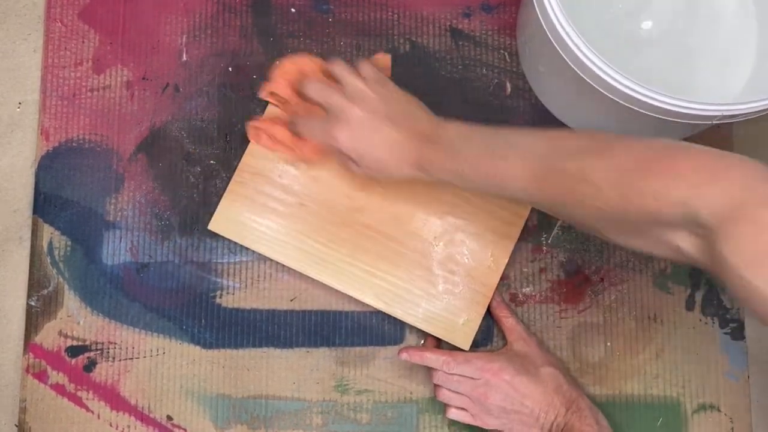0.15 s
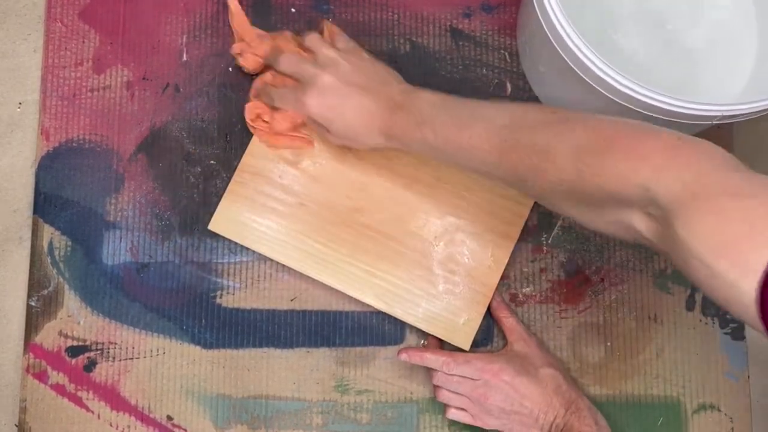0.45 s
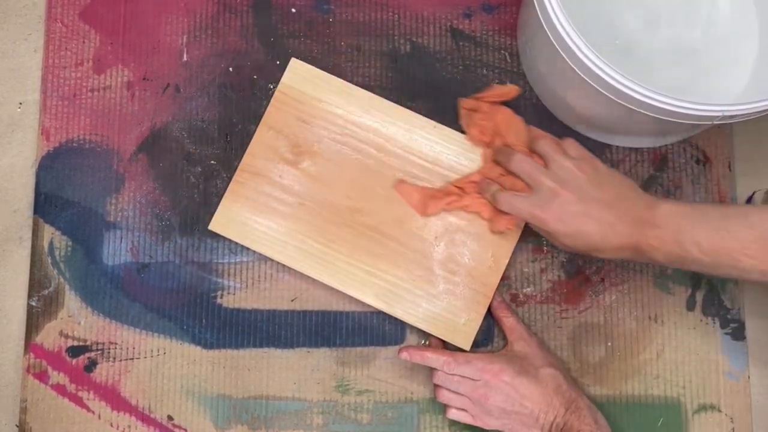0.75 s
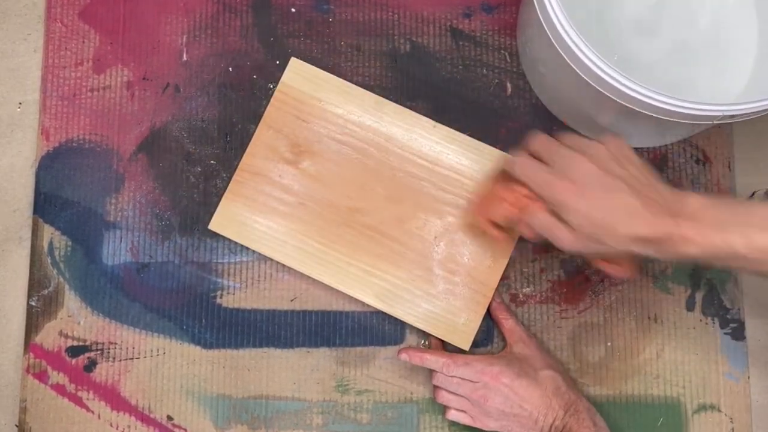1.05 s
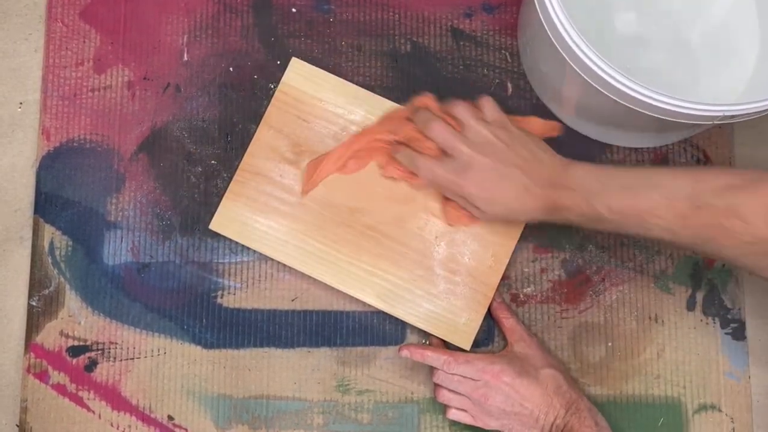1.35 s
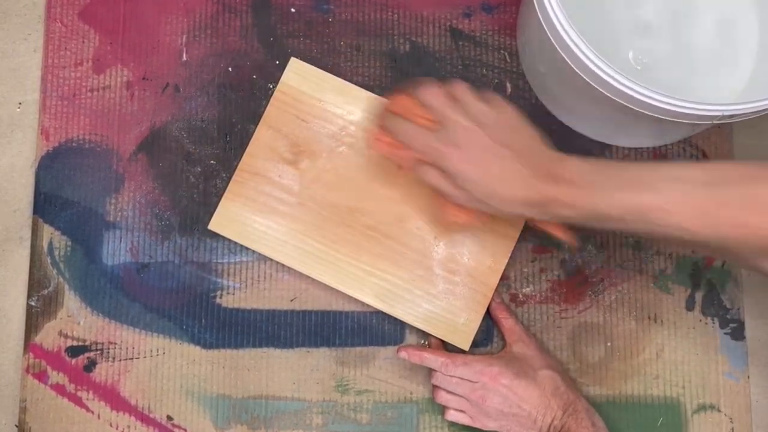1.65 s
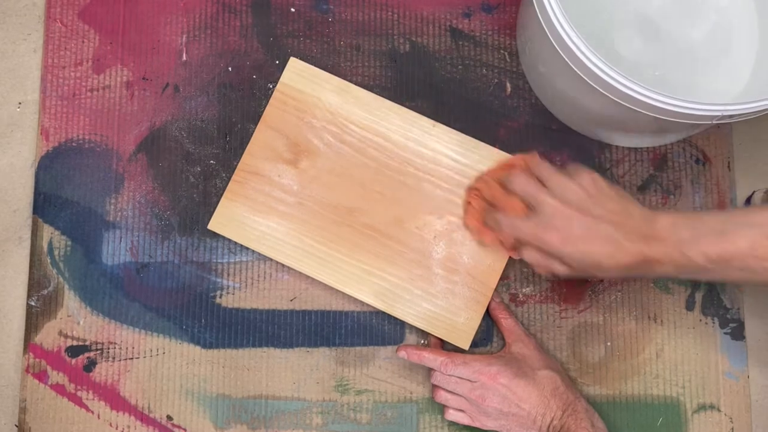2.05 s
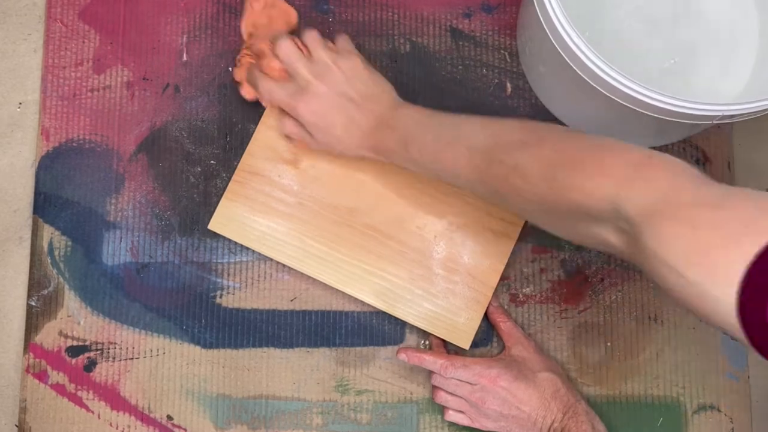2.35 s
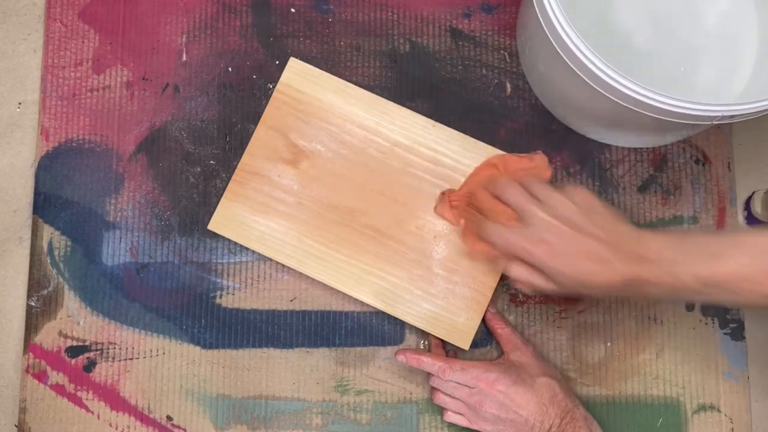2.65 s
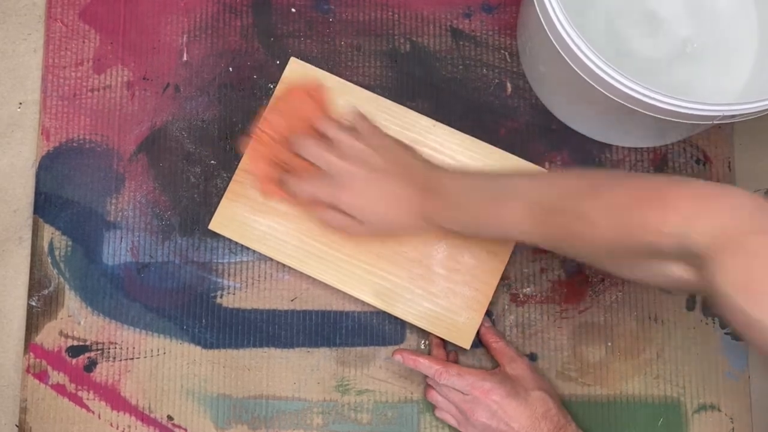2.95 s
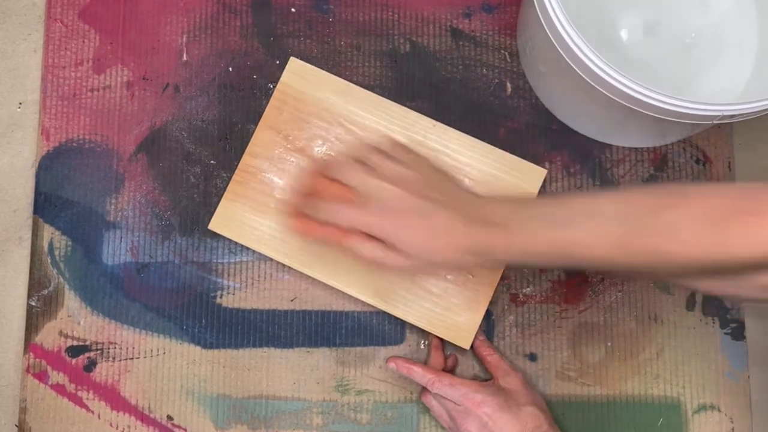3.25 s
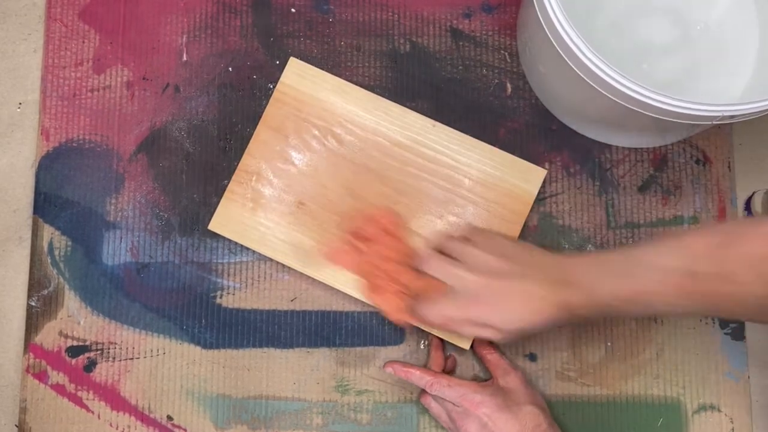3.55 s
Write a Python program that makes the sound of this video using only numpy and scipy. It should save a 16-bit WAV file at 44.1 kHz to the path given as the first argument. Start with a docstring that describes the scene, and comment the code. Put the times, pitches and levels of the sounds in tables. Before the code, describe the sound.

A damp cloth wiped back and forth over a wooden board in quick, scratchy strokes.

```python
"""Wiping a wooden board

At a workbench, close to a two-port microphone, a damp cloth is wiped to and fro over a small board.
Its fibres hiss with its speed, and it pats and ticks where it lands or catches an edge.
Each push of the hand makes the bench top boom at its low modes. Faint room noise lies behind."""
import sys
import numpy as np
from scipy import signal
from scipy.fft import rfft, irfft, next_fast_len
from scipy.io import wavfile
from scipy.ndimage import uniform_filter1d

SR = 44100
rng = np.random.default_rng(int(sys.argv[2]) if len(sys.argv) > 2 else 0)


def int16_out(signal):
    """Quantize to a 16-bit WAV file."""
    q = np.round(np.clip(np.atleast_2d(signal).T, -1, 1) * 32767)
    wavfile.write(sys.argv[1], SR, q.astype(np.int16))


N = 163170

# strokes of the sliding cloth: t/s, hiss level/dB, drag level/dB
STROKES = [(0.0, -57.5, -61.5), (0.07, -67, -61), (0.132, -48.5, -54.5), (0.28, -61, -70.5),
           (0.35, -57, -60.5), (0.399, -59.5, -51.5), (0.481, -48, -56), (0.64, -46, -66.5),
           (0.789, -53, -60), (0.85, -51, -56), (0.889, -42, -62), (0.98, -58, -69.5),
           (1.142, -64.5, -67.5), (1.182, -48.5, -49), (1.2, -57.5, -59.5), (1.23, -54.5, -47.5),
           (1.27, -60.5, -52), (1.34, -48.5, -58.5), (1.45, -48.5, -64), (1.56, -62.5, -67),
           (1.671, -64.5, -70), (1.702, -52.5, -51), (1.74, -60.5, -51), (1.87, -45.5, -53.5),
           (1.97, -48, -55), (2.031, -62.5, -63.5), (2.239, -64, -79.5), (2.272, -57.5, -48.5),
           (2.32, -56, -54), (2.41, -45.5, -65.5), (2.53, -47.5, -59.5), (2.62, -62.5, -71),
           (2.69, -54.5, -69), (2.758, -57.5, -67.5), (2.812, -52.5, -49.5), (2.85, -64.5, -59.5),
           (2.948, -43.5, -58), (3.06, -49.5, -62), (3.128, -61.5, -67.5), (3.23, -58.5, -67.5),
           (3.25, -57.5, -59), (3.291, -66.5, -59.5), (3.318, -40.5, -38), (3.358, -55, -47.5),
           (3.46, -43.5, -54), (3.55, -50, -63), (3.69, -67, -72.5)]
# spectra of the bright hiss and the duller drag: f/Hz, level/dB
HISS_SPECTRUM = [(300, -21.5), (1200, -6.5), (2200, -2), (3300, -1.5), (5000, -4.5), (6500, -3.5),
                 (8500, -5), (11000, 1), (12300, -5), (14000, -10)]
DRAG_SPECTRUM = [(150, 3.5), (300, -2), (600, -1), (1400, -4.5), (2500, -13.5), (6000, -30)]
GRAIN_DB, FLICKER_DB, FLICKER_HZ = 2, 1.3, 29.35
PATCH_DB, PATCH_HZ, PATCH_S = 2.5, 170, .03

# room noise: f/Hz, level/dB
ROOM_SPECTRUM = [(30, -23), (60, -26), (125, -14), (300, -16), (1000, -21), (3000, -26)]
ROOM_DB, ECHO_T60_S = -77, 0.053

# pats and catches of the cloth: t/s, knock peak/dB, f/Hz, crack level/dB
PATS = [(0.053, -42, 1210, -37), (0.095, -46, 890, -58), (0.389, -34.5, 1180, -36),
        (0.426, -34, 1600, -34.5), (1.014, -48, 2140, -44), (1.159, -44, 1260, -61), (1.17, -45, 1890, -32),
        (1.178, -52, 2900, -35), (1.183, -38.5, 1320, -22), (1.221, -34.5, 1200, -51),
        (1.475, -41, 1440, -49), (1.535, -47, 2240, -61), (1.7, -32, 1020, -27.5),
        (2.09, -49.5, 940, -41.5), (2.263, -40.5, 1230, -33.5), (2.302, -38.5, 1540, -58),
        (2.815, -39.5, 756, -58), (2.823, -37, 1010, -50), (2.941, -36, 1060, -60), (3.201, -45, 821, -64),
        (3.241, -36.5, 760, -64), (3.244, -40.5, 370, -70), (3.304, -48, 864, -31), (3.311, -33, 3020, -22),
        (3.313, -23, 960, -40), (3.335, -34.5, 1500, -59)]
# upper modes of the board: f/Hz, gain/dB, t60/s
BOARD_HIGH_MODES = [(347, -7, 0.13), (509, -0.5, 0.031), (714, -8, 0.044), (838, -3, 0.046),
                    (990, 4, 0.022), (1290, 12, 0.012), (1595, 14.5, 0.0068), (2110, 2.5, 0.028),
                    (3040, 2.5, 0.028)]
BLOW_T60_S, CRACK_T60_S, CRACK_RISE_S, KNOCK_OCTAVES = 0.0012, 0.013, 0.00025, 0.52

# pushes of the hand: t/s, drive of bench sway/dB, of top boom/dB, of board knock/dB
HAND_PUSHES = [(0.068, -52, -45, -56), (0.139, -51, -45, -51), (.392, -38, -41.5, -38),
               (0.471, -50, -38.5, -64), (0.786, -40, -47, -42.5), (.85, -60, -43.5, -38.5),
               (1.191, -39.5, -45.5, -57), (1.244, -45, -35, -43), (1.478, -51.5, -68, -50),
               (1.713, -37, -44, -51.5), (1.736, -36, -51, -53), (1.903, -55, -75, -52),
               (2.279, -29.5, -33, -40.5), (2.549, -53.5, -76, -85), (2.822, -34.5, -35.5, -43.5),
               (2.918, -61, -44, -74), (3.322, -29, -15.5, -23.5)]
PUSH_S = 0.0059
# low modes of the bench, its top (the close pair beats) and the board: f/Hz, gain/dB, t60/s
SWAY_MODES = [(47.5, -2, 0.36), (58.9, 7, 0.26), (76.5, -7, 0.16)]
BOOM_MODES = [(125.04, -0.5, 0.61), (133.03, -5.5, 0.51), (144.3, -16, 0.84)]
BOARD_LOW_MODES = [(165.3, 1.5, 0.42), (187.6, 1.5, 0.33), (217.2, -0.5, 0.29), (245, 2.5, 0.12)]
RUMBLE_SWAY_DB, RUMBLE_BOOM_DB, RUMBLE_BOARD_DB = -2, -16, -16.5  # relative to the hiss

# stereo width, with narrow near-mono bands: f/Hz, share of power differing between left and right/0-1
STEREO_WIDTH = [(150, .0003), (300, .03), (650, .42), (1200, .26), (1900, .02), (2700, .25), (4300, .3),
                (4900, .2), (6100, .003), (7000, .25), (8200, .15), (8600, .0005), (9400, .0005),
                (9900, .1), (11600, .12), (12400, .001)]
# lead of the left port over the right: f/Hz, phase/rad
PORT_LEAD = [(200, 0), (600, -.3), (1200, .3), (1900, .05), (2600, .55), (3400, .4), (4300, 1.1),
             (4850, 3.1), (5700, 6.2), (6400, 6.35), (8500, 9.4), (9500, 9.45), (12000, 12.5),
             (12400, 12.566)]
# treble response of the microphone: f/Hz, gain/dB
MIC_RESPONSE = [(11500, 0.5), (12500, -10), (14000, -25)]
LOW_CUT_HZ, HIGH_CUT_HZ = 62.4, 14200


def undb(db):
    return 10 ** (np.asarray(db) / 20)


def unit_rms(x):
    return x / np.sqrt(np.mean(x ** 2))


def per_bin(table, size):
    """A table of f/Hz, value, read at every bin of a transform."""
    hz, values = np.array(table, float).T
    return np.interp(np.log(np.arange(size // 2 + 1) * SR / size + 1), np.log(hz), values)


def colour(x, spectrum):
    """Noise shaped to a spectrum, at unit RMS."""
    return unit_rms(irfft(rfft(x) * undb(per_bin(spectrum, N)), N))


def wander(rate_hz):
    """Smoothed random steps, at unit RMS."""
    hold = int(SR / rate_hz)
    steps = np.repeat(rng.standard_normal(N // hold + 1), hold)
    return unit_rms(uniform_filter1d(uniform_filter1d(steps, hold), hold)[:N])


def ring(force, modes):
    """Damped modes, each answering a blow with a dying sine."""
    out = 0
    for hz, db, t60 in modes:
        pole = np.exp(2j * np.pi * hz / SR - np.log(1000) / (t60 * SR))
        out = out + undb(db) * signal.lfilter([1], [1, -pole], force).imag
    return out


def stroke_levels():
    """Hiss and drag level/dB at every sample."""
    times, *levels = np.array(STROKES).T
    return [np.interp(np.arange(N) / SR, times, db) for db in levels]


def fibre_grains(channels):
    """Dense grains of noise from fibres that catch in small patches of pitch and time."""
    grains = rng.standard_normal((channels, N)) * undb(GRAIN_DB * rng.exponential(size=N))
    frames = signal.stft(grains, nperseg=1024)[2]
    patches = rng.standard_normal(frames.shape[-2:])
    patches = uniform_filter1d(patches, int(PATCH_HZ * 1024 / SR), axis=0)
    patches = uniform_filter1d(patches, int(PATCH_S * SR / 512))
    return signal.istft(frames * undb(PATCH_DB * unit_rms(patches)), nperseg=1024)[1][:, :N]


def cloth_rub(channels):
    """Fibres hiss over the wood above a duller drag; unrelated noise channels share one motion."""
    hiss_db, drag_db = stroke_levels()
    hiss = colour(fibre_grains(channels), HISS_SPECTRUM) * undb(hiss_db + FLICKER_DB * wander(FLICKER_HZ))
    drag = colour(fibre_grains(channels), DRAG_SPECTRUM) * undb(drag_db + 1.93 * wander(rate_hz=130))
    return hiss + drag


def room_noise(channels):
    """The faint, steady background around the bench."""
    return undb(ROOM_DB) * colour(rng.standard_normal((channels, N)), ROOM_SPECTRUM)


def cloth_pats():
    """Each short, rough blow rings the board modes near its pitch, with a bright wet crack."""
    out, t = np.zeros(N + 8192), np.arange(4096) / SR
    noise = rng.standard_normal((len(PATS), 2, len(t)))
    crack_envelope = (1 - np.exp(-t / CRACK_RISE_S)) * 1000 ** (-t / CRACK_T60_S)
    for (start_s, knock_db, hz, crack_db), (roughness, fizz) in zip(PATS, noise):
        near_modes = [(f, db - 6 * (np.log2(f / hz) / KNOCK_OCTAVES) ** 2, t60)
                      for f, db, t60 in BOARD_HIGH_MODES]
        blow = (1 + roughness) * 1000 ** (-t / BLOW_T60_S)
        knock = ring(signal.lfilter(*signal.iirpeak(hz, Q=1, fs=SR), blow), near_modes)
        crack = signal.lfilter(*signal.iirpeak(3000, Q=1.4, fs=SR), fizz)
        crack += undb(-9) * signal.lfilter(*signal.iirpeak(11000, Q=3, fs=SR), fizz)
        i = int(start_s * SR)
        out[i:i + len(t)] += undb(knock_db) * knock / np.abs(knock).max()
        out[i:i + len(t)] += undb(crack_db) * crack * crack_envelope
    return out[:N]


def bench_boom():
    """Soft pushes of the hand and the rubbing itself drive the low modes of bench and board."""
    impulses = np.zeros((3, N))
    for start_s, *drive_db in HAND_PUSHES:
        impulses[:, int(start_s * SR)] = undb(drive_db)
    pulse = np.hanning(int(PUSH_S * SR))
    hiss_db, _ = stroke_levels()
    bodies = (SWAY_MODES, RUMBLE_SWAY_DB), (BOOM_MODES, RUMBLE_BOOM_DB), (BOARD_LOW_MODES, RUMBLE_BOARD_DB)
    out = 0
    for impulse, (modes, db) in zip(impulses, bodies):
        pushes = np.convolve(impulse, -pulse / pulse.sum())[:N]
        noise = rng.standard_normal(N)
        noise /= np.std(ring(noise, modes))  # rings the modes at unit level
        rumble = noise * undb(hiss_db + db + 1.2 * wander(rate_hz=8.2))
        out = out + ring(pushes + rumble, modes)
    return out


def scene():
    """Cloth and wood close up: a mono centre blended, by frequency, with wide noise and short echoes."""
    rub_and_room = cloth_rub(channels=3) + room_noise(channels=3)  # centre, left, right
    wood = cloth_pats() + bench_boom()
    t = np.arange(4096) / SR
    echo = rng.standard_normal((2, len(t))) * 1000 ** (-t / ECHO_T60_S)
    echo /= np.sqrt(np.sum(echo ** 2, axis=1, keepdims=True))
    size = next_fast_len(N + 4096)
    width = per_bin(STEREO_WIDTH, size)
    centre = rfft(rub_and_room[0] + wood, size)
    wide = rfft(rub_and_room[1:], size) + rfft(wood, size) * rfft(echo, size)
    return irfft(np.sqrt(1 - width) * centre + np.sqrt(width) * wide, size)[:, :N]


def record(dry):
    """The microphone's two ports differ in phase; deep bass and the highest treble are cut."""
    size = next_fast_len(N + 4096)
    half_lead = np.exp(1j * per_bin(PORT_LEAD, size) / 2)
    ports = undb(per_bin(MIC_RESPONSE, size)) * np.array([half_lead, half_lead.conj()])
    x = irfft(rfft(dry, size) * ports, size)[:, :N]
    x = signal.sosfilt(signal.butter(3, LOW_CUT_HZ, "high", fs=SR, output="sos"), x)
    return signal.sosfilt(signal.ellip(8, .2, 70, HIGH_CUT_HZ, fs=SR, output="sos"), x)


dry = scene()
out = record(dry)
int16_out(out)
```